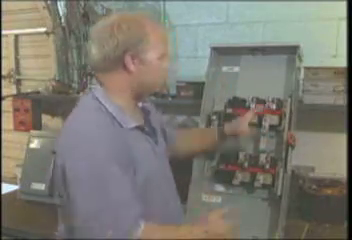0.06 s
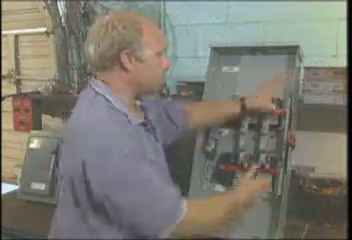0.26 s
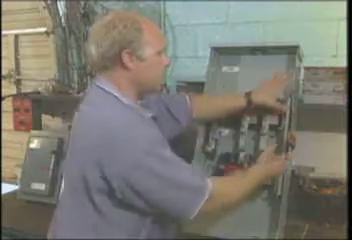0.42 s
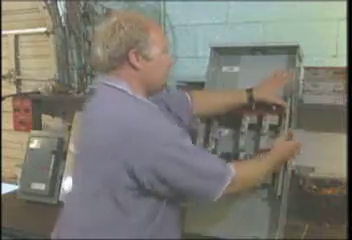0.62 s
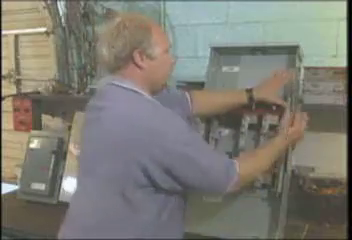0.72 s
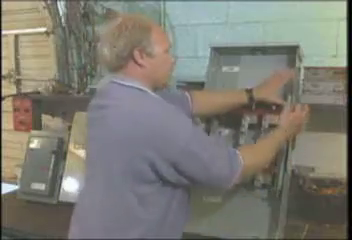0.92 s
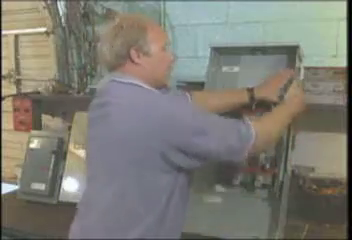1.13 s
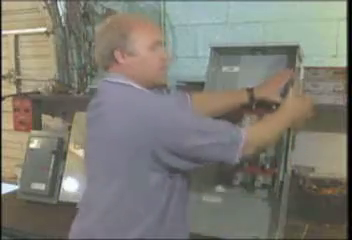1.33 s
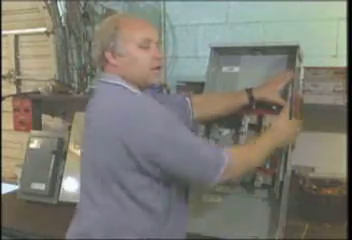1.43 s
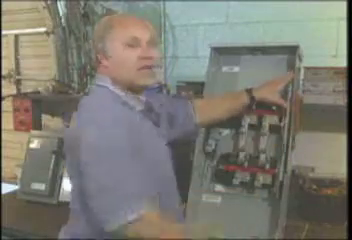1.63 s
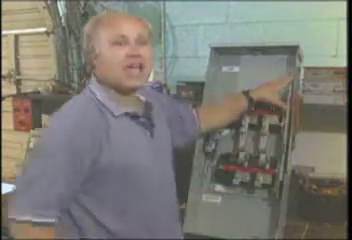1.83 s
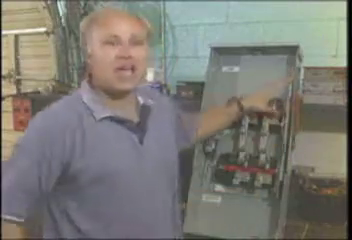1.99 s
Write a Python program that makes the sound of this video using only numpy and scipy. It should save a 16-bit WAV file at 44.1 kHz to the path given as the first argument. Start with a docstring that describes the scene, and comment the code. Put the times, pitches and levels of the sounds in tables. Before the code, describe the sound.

In a hard-walled workshop with low hum, a metal lever clanks against its sheet-steel box, light rattles follow, then a violent steel crack with boomy panel ring and short echo, slightly distorted on one microphone.

```python
"""In a hard workshop a heavy switch handle on a sheet-steel box is gripped, pushed and snaps home.
Damped modes and decaying noise make each blow on the box; noise bursts and damped modes, the steel cracks.
The linkage scrapes and loose parts buzz as grainy noise; large panels swell and ring out as sines.
Diffuse echoes follow the blows and cracks, over noise, hum bands and a whine. One overloaded microphone hears all."""
import sys
import numpy as np
from scipy import signal
from scipy.fft import rfft, irfft, next_fast_len
from scipy.io import wavfile
from scipy.ndimage import uniform_filter1d, map_coordinates

SR = 44100
rng = np.random.default_rng(int(sys.argv[2]) if len(sys.argv) > 2 else 0)


def invert_db(x):
    """Field ratio 10**(x/20) for x, a level in decibels (scalar or array-like)."""
    u = np.asarray(x, float) / 20
    return 10 ** u


def store_pcm(level_fs):
    """Save levels as 16-bit WAV."""
    pcm = np.round(np.clip(level_fs, -1, 1) * 32767).astype(np.int16)
    wavfile.write(sys.argv[1], SR, np.atleast_2d(pcm).T)


N = 90713
SNAP_S = 1.203  # the box jolts and the loose parts begin to buzz

# relative noise spectrum of the small steel parts: f/Hz, level per Hz/dB
PARTS_SPECTRUM = [(590, -32), (1000, -11), (2500, -9), (2780, -14), (4170, -8.5), (6330, -11), (8450, -13),
                  (14100, -23.5), (16000, -38)]


def box_blows():
    """Modal excitation: a blow rings the modes near its centre and a dense field of panel modes."""
    # blows: t/s, level before the common trim/dB, centre f/Hz,
    # distance from centre at which modes are 6 dB weaker/octaves, share of the free ring time
    blows = [(.619, -35.5, 250, 1.9, 0.32), (.628, -30.5, 734, 0.57, 0.63), (.767, -8, 420, .3, 0.24),
             (.779, -15, 1050, 0.74, 0.38), (.790, -16.5, 560, 0.38, 0.79), (.805, -18, 480, 0.28, 0.27),
             (.850, -31, 183, 0.091, 2), (.940, -24, 410, 0.58, 0.45), (.905, -22, 880, 0.85, 0.23),
             (.961, -23.5, 900, 0.99, 0.23), (1.060, -33, 880, 0.95, 0.89), (1.112, -30.5, 500, 0.84, 0.78),
             (1.135, -32, 640, .15, 1.1), (1.150, -31, 300, 0.85, 1.4), (1.188, -15, 187, 0.85, 0.2),
             (1.196, -11.5, 1080, 1.22, 1.36), (1.206, -7, 643, 0.31, 0.71), (1.222, -10, 523, 0.92, .5),
             (1.258, -17, 514, 0.83, 0.33), (1.296, -15.5, 504, 0.13, 0.37), (1.350, -24, 703, 2.2, 1.25),
             (1.408, -20.5, 590, 0.5, 0.26), (1.420, -20, 830, 1.36, 0.26), (1.445, -26.5, 493, 0.38, 0.39)]
    # freely ringing box modes: f/Hz, level/dB, t60/s
    box_modes = [(128.5, -13.5, 0.73), (183, 1, .8), (229.2, -0.5, 0.58), (386.6, -0.5, 0.45),
                 (430.9, -1.5, .6), (482, -6.5, 0.65), (524, -13.5, 0.94), (631.5, 0.5, 0.43),
                 (643.5, 4, 0.15), (776.6, -4, 0.51), (894.6, -11.5, 0.97), (934, -15.5, 0.55),
                 (1121, -15, 0.14), (1293, -8, 0.25), (1503, -15, 0.56), (1740, -8, 0.24),
                 (2140, -12, 0.47)]
    # relative spectrum of the unresolved panel modes: f/Hz, level per Hz/dB
    panel_spectrum = [(59, -61.5), (100, -37.5), (219, 1), (280, -4.5), (615, -15), (701, -24.5),
                      (799, -12.5), (5000, -27.5), (6500, -63.5), (11000, -120)]
    bass_cut_hz, rattle_db, rattle_t60_s = 110, -2.5, 0.56
    swell_s, trim_db, room_db = 0.0018, -3.5, -6.5
    out = np.zeros(N)
    t = np.arange(SR * 2 // 3) / SR
    for start_s, db, centre_hz, width, share in blows:
        def weight(hz):
            return -6 * (np.log2((hz + 1) / centre_hz) / width) ** 2

        def panel_gain(hz):
            return invert_db(along(panel_spectrum, hz) + weight(hz)) * (hz > bass_cut_hz)

        rattle = noise(len(t), panel_gain) * invert_db(rattle_db - 60 * t / (share * rattle_t60_s))
        ringing = ring(box_modes, t, weight, share)
        onset = 1 - np.exp(-t / swell_s)
        blow = invert_db(db + trim_db) * (ringing + rattle) * onset
        add(out, start_s, blow)
        add(out, start_s, invert_db(room_db) * room(blow))
    return out


def box_jolt():
    """Rigid-body response: the whole box jolts on its wall as one damped low oscillation."""
    # level/dB, f/Hz, t60/s
    jolt_mode = (-32.5, 81, .15)
    out = np.zeros(N)
    t = np.arange(SR) / SR
    db, hz, t60 = jolt_mode
    add(out, SNAP_S, invert_db(db - 60 * t / t60) * np.sin(2 * np.pi * hz * t))
    return out


def large_panels():
    """Sustained resonance: panels swell, are kept going by the rattle, then decay exponentially."""
    # f/Hz, level/dB, t60 after the hold/s
    panel_modes = [(227.4, -23, 0.86), (382, -35, 1.21), (77.8, -45, 4.5), (130.1, -45.5, 1.07)]
    start_s, swell_s, hold_s = 1.205, 0.038, 0.22
    out = np.zeros(N)
    t = np.arange(SR) / SR
    swell = 1 - np.exp(-(t / swell_s) ** 2)
    for hz, db, t60 in panel_modes:
        decay = invert_db(db - 60 * np.maximum(t - hold_s, 0) / t60)
        add(out, start_s, decay * swell * np.sin(2 * np.pi * hz * t))
    return out


def cracks():
    """Impact of steel on steel: a broadband burst of tiny contacts plus the modes of the small parts."""
    # t/s, burst level/dB, burst t60/s, tilt about 5 kHz/dB per octave, ring relative to burst/dB
    impacts = [(0.297, -41, 0.015, 12, -33), (0.619, -21, 0.065, -1.5, -4), (.762, -29, 0.03, -7, -6.5),
               (.767, -22.5, 0.12, -5, -16), (0.777, -29.5, 0.15, -4, -10),
               (0.789, -36.5, 0.073, -5, -11.5), (.806, -43.5, 0.03, 0.3, -14.5),
               (.821, -30, 0.021, 0.5, -13), (0.906, -37, 0.044, -6, -10.5), (.960, -40, 0.067, -5, -11),
               (1.058, -33, 0.05, -0.1, -7.5), (1.185, -20.5, 0.15, -1.2, -9.5),
               (1.190, -12.5, 0.095, 1.2, -10), (1.196, -7.5, 0.069, -0.5, -8.5),
               (1.201, -13.5, 0.072, -1, -12), (1.207, -11.5, 0.079, -4, -10.5),
               (1.213, -11.5, 0.036, -7.04, -17), (1.411, -38, 0.059, -4.5, -12)]
    # handle-part modes before tilt and damping: f/Hz, level/dB, t60/s
    steel_modes = [(1902, -9.5, 0.32), (2136, -12, 0.24), (2601, -9.5, .25), (2986, -18.5, 0.24),
                   (3614, -13.5, 0.11), (4000, -21.5, 0.068), (4790, -20, .05), (5500, -5.5, 0.082),
                   (6020, -2, 0.069)]
    onset_s, room_db = 0.00051, -13.5
    out = np.zeros(N)
    t = np.arange(SR // 3) / SR
    for start_s, db, t60, tilt_db, ring_db in impacts:
        def tilt(hz):
            return tilt_db * np.log2((hz + 1) / 5000)

        def burst_gain(hz):
            return invert_db(along(PARTS_SPECTRUM, hz) + tilt(hz))

        burst = grain(len(t), depth_db=3) * noise(len(t), burst_gain) * invert_db(-60 * t / t60)
        ringing = invert_db(ring_db) * ring(steel_modes, t, tilt, share=0.8, blur=2.5)
        crack = invert_db(db) * (burst + ringing) * (1 - np.exp(-t / onset_s))
        add(out, start_s, crack)
        add(out, start_s, invert_db(room_db) * room(crack))
    return out


def loose_parts():
    """Repeated micro-impact: loose parts buzz after the snap as unevenly modulated noise."""
    # t/s, level/dB
    buzz_level = [(1.2, -51.5), (1.214, -21.5), (1.3, -25.5), (1.44, -36.5), (1.55, -53), (1.7, -66),
                  (1.9, -90.5)]
    # relative spectrum: f/Hz, level per Hz/dB
    buzz_spectrum = [(590, -32), (1000, -1.5), (1500, -5), (1590, -6), (2770, -10.5), (6710, -14.5),
                     (11000, -23.5), (15000, -45.5)]
    buzz = unit(grain(N, depth_db=1.0) * noise(N, lambda hz: invert_db(along(buzz_spectrum, hz))))
    return invert_db(curve(buzz_level)) * buzz * (np.arange(N) / SR > SNAP_S)


def linkage():
    """Sliding friction: many tiny contacts make a faint grainy scrape while the handle travels."""
    # t/s, level/dB
    slide_level = [(.6, -99), (.64, -81), (.8, -90), (.95, -59.5), (1.1, -55), (1.18, -52), (1.22, -100)]
    scrape = unit(grain(N, depth_db=1.5) * noise(N, lambda hz: invert_db(along(PARTS_SPECTRUM, hz))))
    return invert_db(curve(slide_level)) * scrape


def workshop():
    """Stationary sources: coloured noise and narrow hum bands, slowly varied in level, plus a steady whine."""
    # relative background spectrum: f/Hz, level per Hz/dB
    air_spectrum = [(12, -48), (20, -26), (130, -5.5), (154, -14), (270, -17), (660, -18), (897, -24),
                    (3440, -38), (13200, -51), (14300, -64.5), (16000, -45)]
    # wavering hum, before the level change: centre f/Hz, half-width at half amplitude/Hz, level/dB
    hum_bands = [(34, 12, -61.5), (80, 6.2, -54), (126.4, 24, -51.5), (183.6, 35, -56.5)]
    # change of background level: t/s, level/dB
    background_rise = [(0, -1.4), (.5, -1), (1.5, 9.5), (2.06, -1.5)]
    whine_hz, whine_db = 15580, -75.5
    background = invert_db(-52) * noise(N, lambda hz: invert_db(along(air_spectrum, hz)))
    for centre, width, db in hum_bands:
        background += invert_db(db) * noise(N, lambda hz: 1 / (1 + ((hz - centre) / width) ** 2))
    whine = invert_db(whine_db) * np.sin(2 * np.pi * whine_hz * np.arange(N) / SR)
    return invert_db(curve(background_rise)) * background + whine


def ring(modes, t, weight_db, share, blur=1):
    """Modal superposition: damped sines, each with a random level and a wandering phase."""
    scatter_db, wander_rad, wander_s = 1.5, 0.69, 0.045  # knots of the wander lie wander_s apart
    hz, db, t60 = np.transpose(modes)[..., None]
    chance = rng.standard_normal((len(modes), 1))
    knots = rng.standard_normal((len(modes), 200))
    wander = blur * wander_rad * np.array([map_coordinates(k, [t / wander_s]) for k in knots])
    phase = 2 * np.pi * hz * t + wander - wander[:, :1]  # every mode starts at phase zero
    level_db = db + weight_db(hz) + scatter_db * chance - 60 * t / (share * t60)
    return np.sum(invert_db(level_db) * np.sin(phase), 0)


def room(x):
    """Diffuse reverberation: convolution with delayed noise whose decay time depends on frequency."""
    # f/Hz, t60/s
    room_decay = [(100, 1), (400, 0.55), (1500, 0.46), (5000, 0.67), (14000, 0.37)]
    delay_s = 0.008
    hz, t, z = signal.stft(rng.standard_normal(SR), SR, nperseg=256)
    decay = invert_db(-60 * t / along(room_decay, hz)[:, None])
    tail = signal.istft(z * decay, SR, nperseg=256)[1]
    delayed = np.pad(x, (round(delay_s * SR), 0))
    return signal.fftconvolve(delayed, tail / np.linalg.norm(tail))


def grain(n, depth_db):
    """Random amplitude modulation: fast uneven gain of many tiny contacts, depth_db rms."""
    return invert_db(depth_db * unit(uniform_filter1d(rng.standard_normal(n), size=100)))


def noise(n, gain):
    """Spectral shaping: noise of rms 1 with a gain that depends on frequency."""
    m = next_fast_len(n + 4096)
    spectrum = rfft(rng.standard_normal(m)) * gain(np.fft.rfftfreq(m, 1 / SR))
    return unit(irfft(spectrum, m)[:n])


def unit(x):
    """Power normalisation: scale to rms 1."""
    return x / np.sqrt(np.mean(x ** 2) + 1e-20)


def along(points, hz):
    """Logarithmic frequency scale: (f/Hz, value) points interpolated in log frequency."""
    f, v = np.transpose(points)
    return np.interp(np.log(hz + 1), np.log(f + 1), v)


def curve(rows):
    """Linear envelope: (t/s, value) points, one value per sample."""
    return np.interp(np.arange(N) / SR, *np.transpose(rows))


def add(out, s, x):
    """Superposition: mix x into out from time s."""
    part = out[round(s * SR):][:len(x)]
    part += x[:len(part)]


def scene():
    """Superposition of all sources at one microphone, which feeds both channels."""
    box = box_blows() + box_jolt() + large_panels()
    mix = box + cracks() + loose_parts() + linkage() + workshop()
    return np.tile(mix, (2, 1))


def roll_off(x):
    """The treble ends steeply here."""
    return signal.sosfilt(signal.butter(12, 16500, fs=SR, output="sos"), x)


def record(dry):
    """Saturation and band limitation: soft overload, a sharp upper limit and a first-order low cut."""
    clip, knee = 0.84, 5.5  # limiting amplitude, sharpness of the bend
    top_hz, low_cut_hz = 16400, 20
    x = dry / (1 + np.abs(dry / clip) ** knee) ** (1 / knee)
    hz = np.fft.rfftfreq(N, 1 / SR)
    low_cut = 1j * hz / (low_cut_hz + 1j * hz)
    x = irfft(rfft(x) * (hz < top_hz) * low_cut, N)
    return roll_off(x)


dry = scene()
out = record(dry)
store_pcm(out)
```